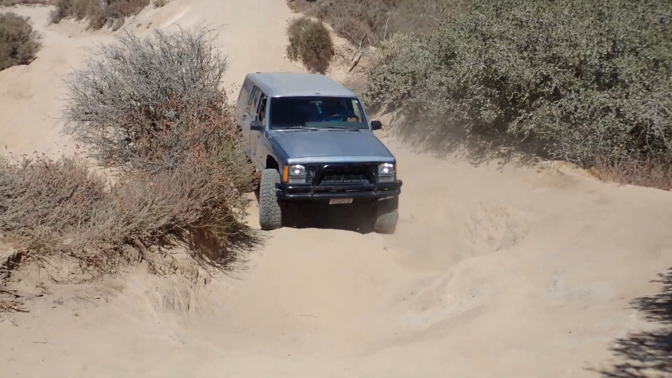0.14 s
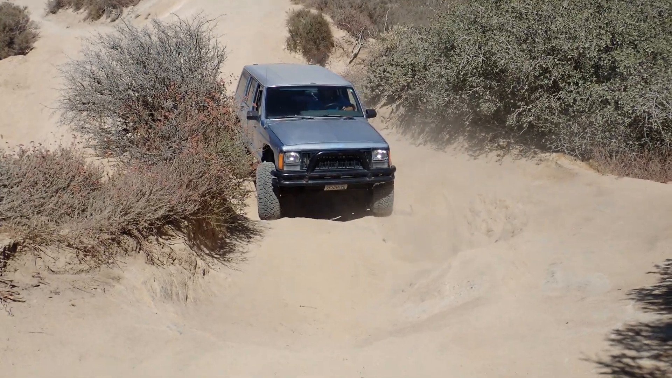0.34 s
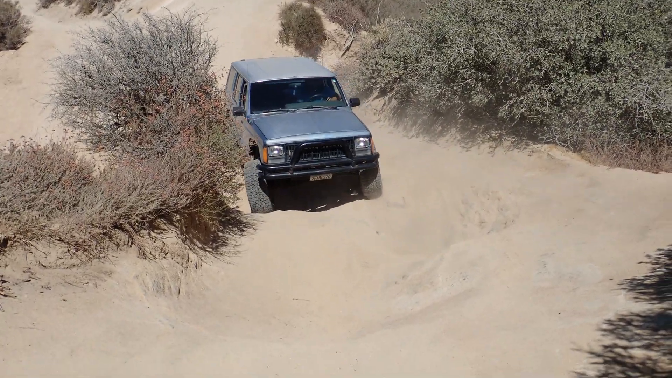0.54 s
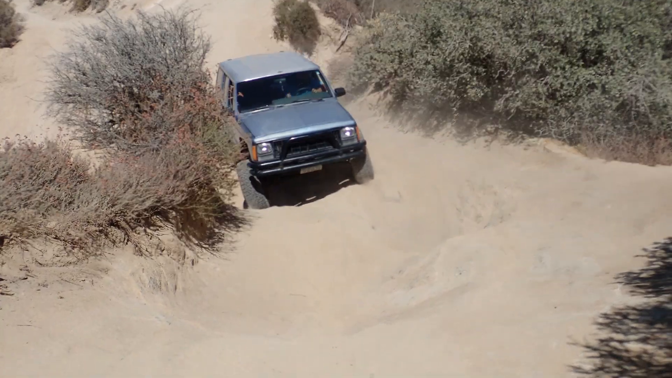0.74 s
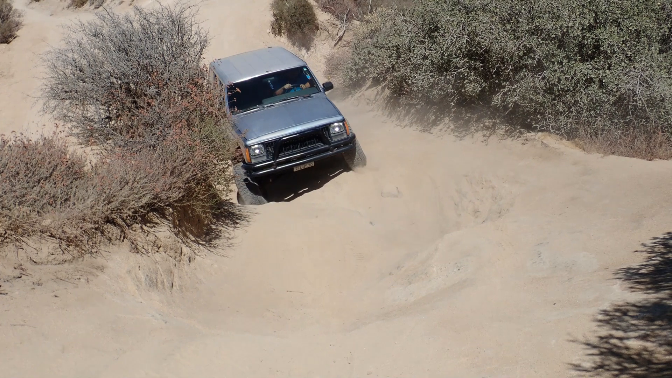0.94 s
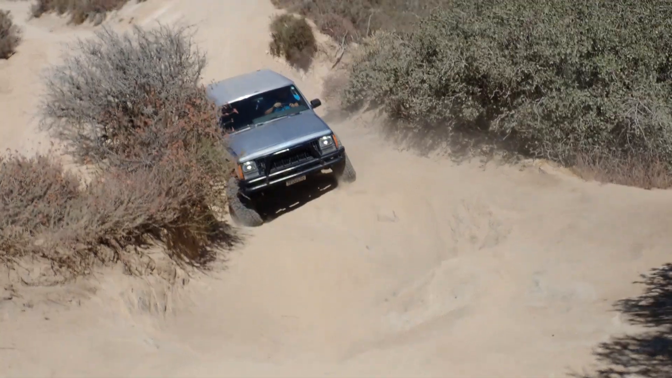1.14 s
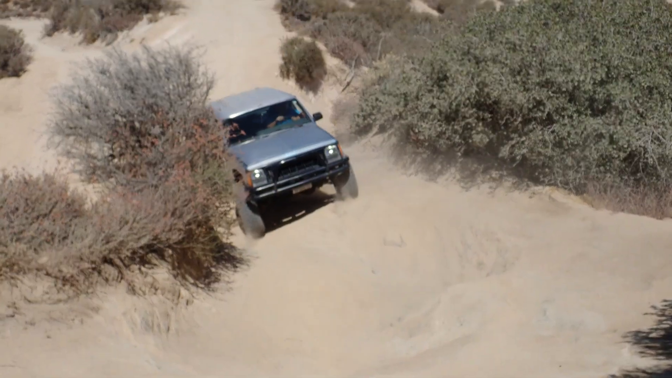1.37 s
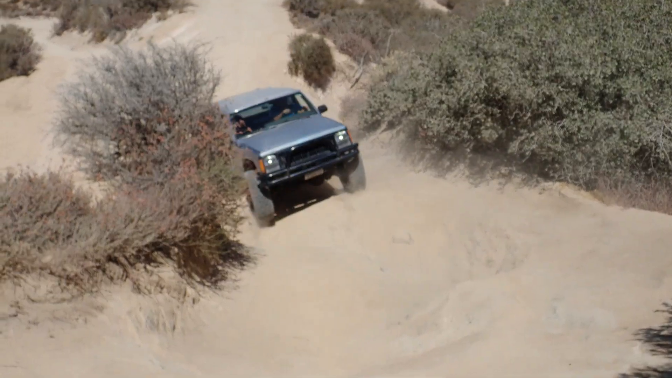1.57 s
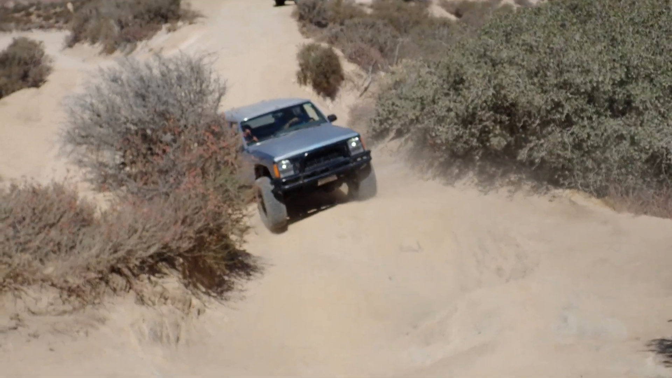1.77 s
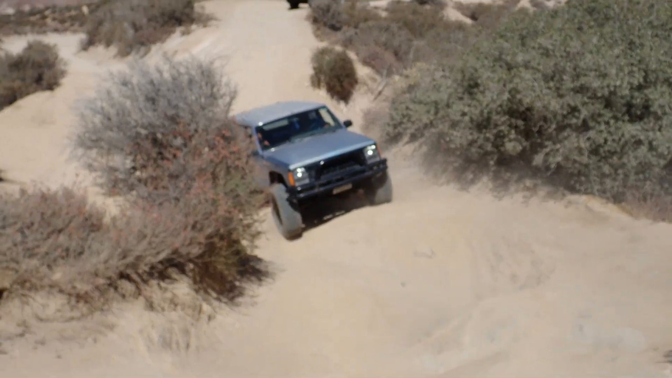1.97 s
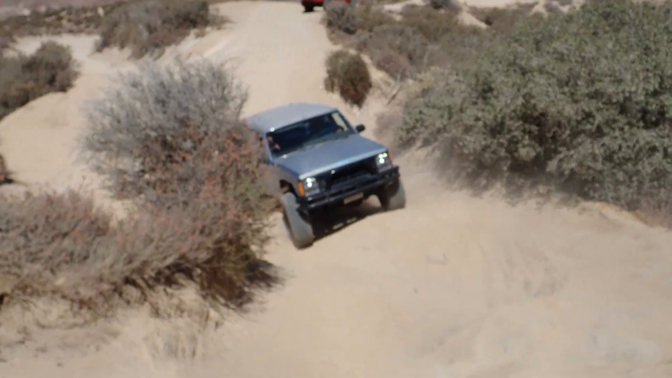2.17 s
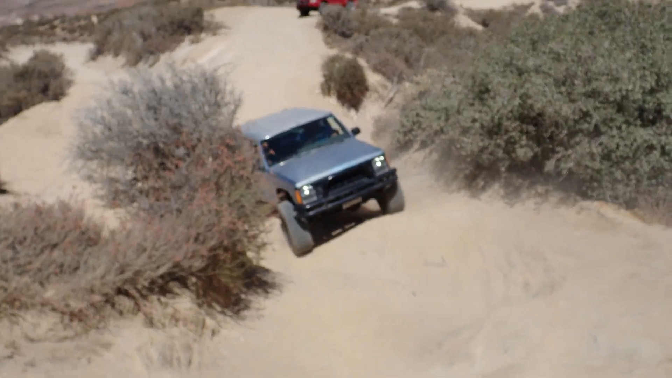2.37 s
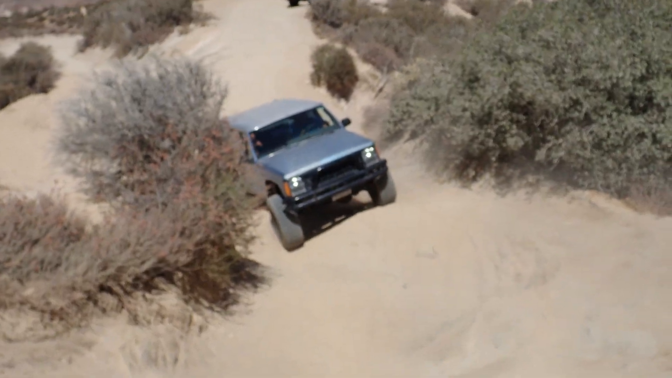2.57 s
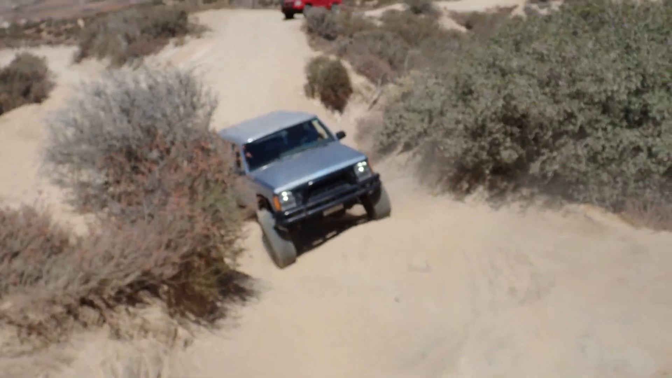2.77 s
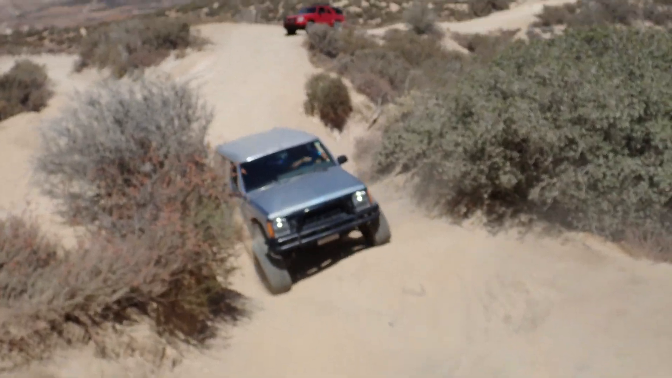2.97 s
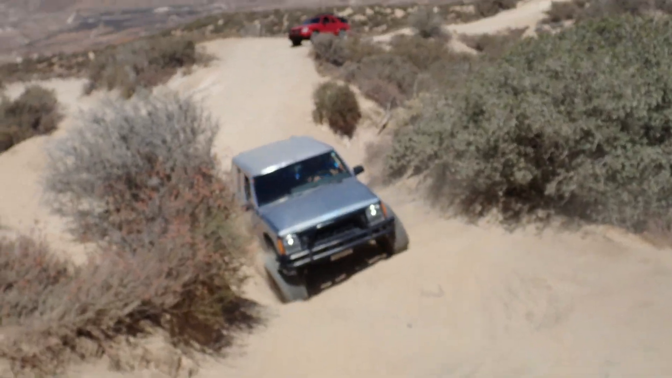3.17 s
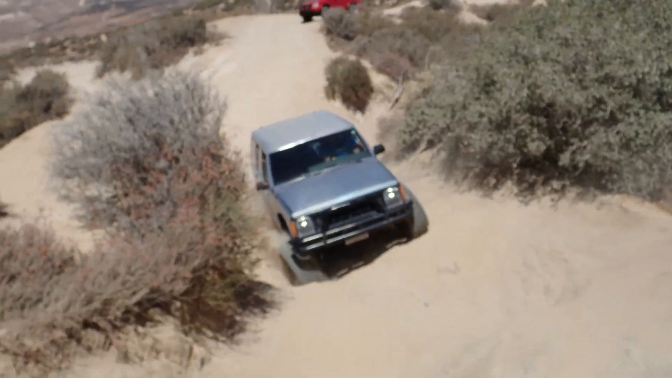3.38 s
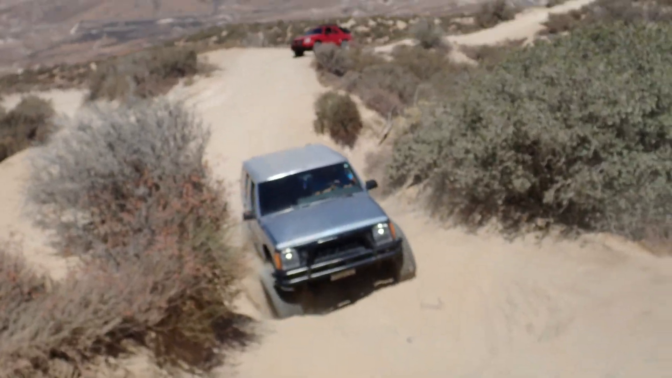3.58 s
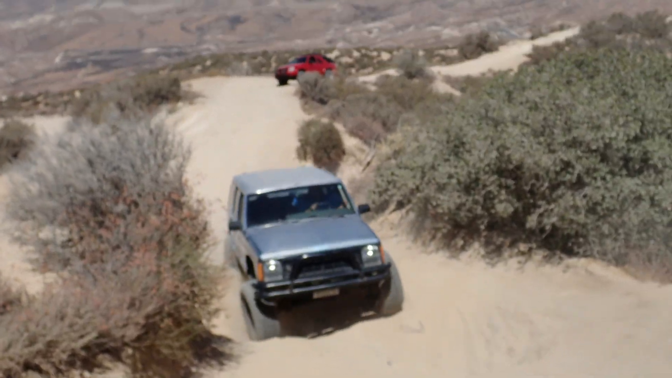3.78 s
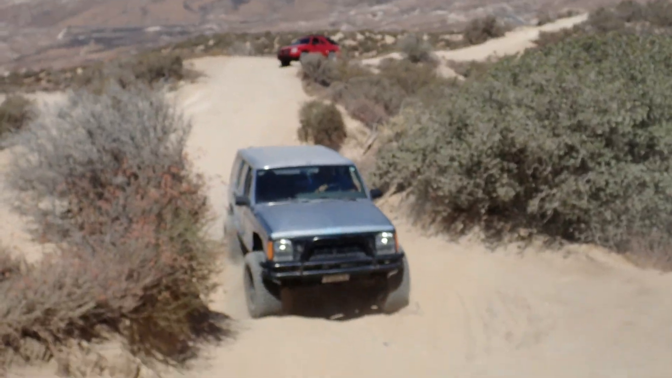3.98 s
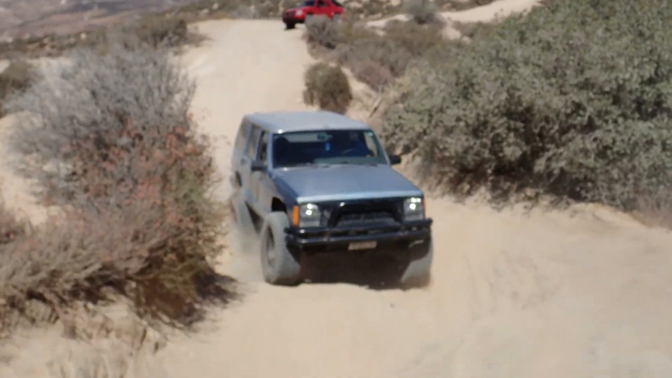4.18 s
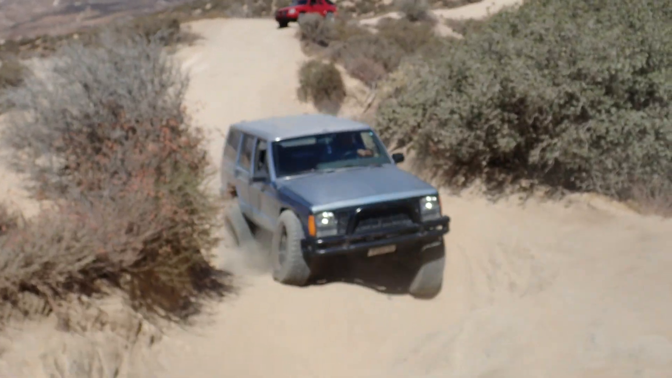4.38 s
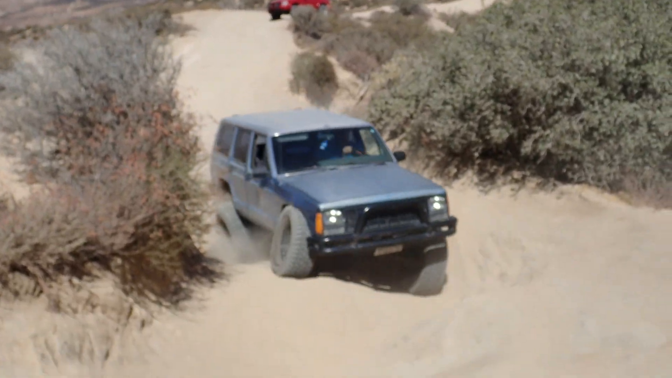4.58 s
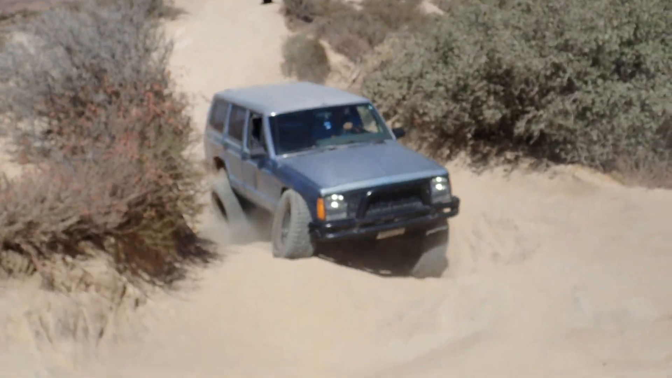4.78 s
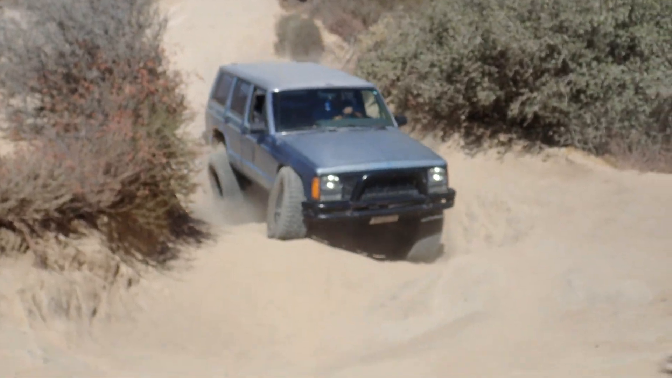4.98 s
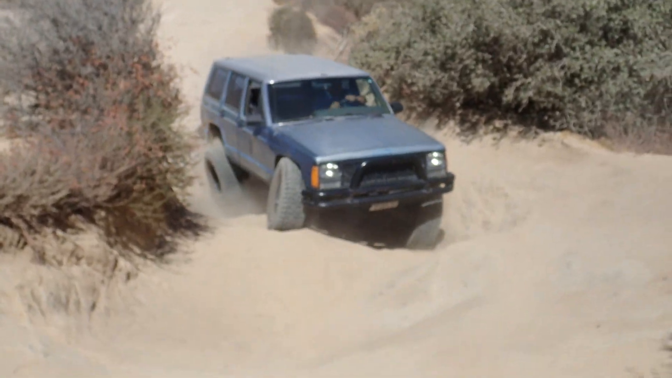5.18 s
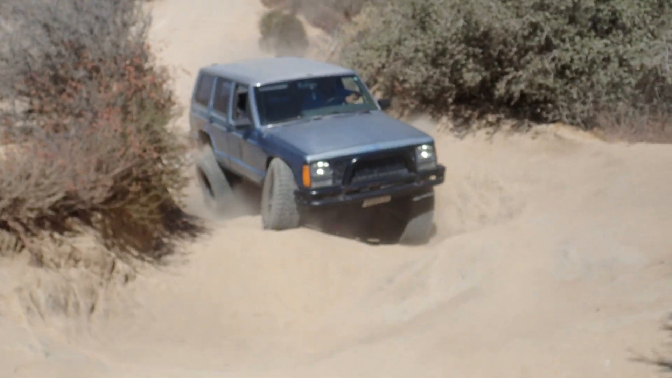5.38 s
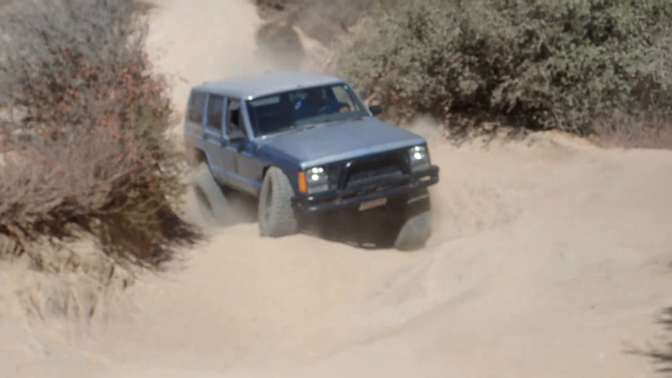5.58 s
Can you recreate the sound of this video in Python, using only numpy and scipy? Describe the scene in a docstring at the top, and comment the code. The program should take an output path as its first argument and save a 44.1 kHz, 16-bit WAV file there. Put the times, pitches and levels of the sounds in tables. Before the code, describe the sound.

A six-cylinder off-road vehicle works up a rutted dirt slope, heard outdoors from in front by a small stereo microphone. It begins with a low, uneven burble under airy hiss and trickling sand, with faint tyre scuffs. At about 0.9 s the throttle opens and a deep exhaust drone sweeps upward, peaking near 1.6 s and dropping by 2.1 s; a short rough tyre groan sounds around 1.8 s. A longer, stronger surge follows from 2.1 to 3.8 s, highest near 3.6 s, with gritty crunches from 3.1 s and rattly engine roar growing closer. The pitch falls, then a brief rev comes at 4.2 s. Sharp stone snaps strike around 4.4 s, another short rev follows at 4.5 s, and dense tyre crunches and thuds cluster from 4.6 to 5.0 s. The exhaust then softens and sinks to a low burble by 5.6 s, with smaller scrubs and a faint click.

```python
"""On a rutted dirt slope a six-cylinder SUV climbs in bursts of throttle towards two microphone ports.
Speed and throttle set the engine levels: the exhaust drones at its firing rate and octave, booms and rasps.
Intake and engine bay noise roars with rattles in it; fan air and trickling sand hiss above.
The tyres scrub and crunch as filtered noise bursts, one slip groans through narrow resonances, and stones
snap as short decaying tones. The unequal ports separate the treble in level and phase."""
import sys
import numpy as np
from scipy import signal
from scipy.fft import rfft, irfft
from scipy.io import wavfile
from scipy.ndimage import uniform_filter1d

SR = 44100
rng = np.random.default_rng(int(sys.argv[2]) if len(sys.argv) > 2 else 0)


def unload_audio(sound):
    """Save the sound as a 16-bit wav file, at the path given as the first command line argument."""
    columns = np.transpose(np.atleast_2d(sound))
    # keep every value between -1 and 1, then stretch to whole-number steps
    steps = np.round(np.clip(columns, -1, 1) * 32767)
    wavfile.write(sys.argv[1], SR, steps.astype(np.int16))


N = 248283
T = np.arange(N) / SR  # time of each sample [s]

# Engine speed: (time [s], firing rate [Hz])
SPEED = [(0, 49.57), (.6, 45.97), (.93, 49.34), (1.4, 101.3), (1.6, 110.8), (1.72, 102), (2.1, 46.76),
         (2.2, 49.93), (2.45, 94.4), (2.7, 120.8), (3, 111.8), (3.42, 125.4), (3.58, 139.2), (3.85, 124.6),
         (4.23, 78.73), (4.5, 102.9), (4.9, 62.95), (5.18, 61.44), (5.3, 46.92), (5.63, 36.35)]
# Presses of the pedal: (down [s], opening time [s], up [s], throttle [1 = a hard push])
SURGES = [(.89, 0.22, 1.9, 0.92), (2.09, 0.21, 3.8, 0.97), (3.58, .1, 3.8, 0.89), (4.2, .08, 4.37, 1.05),
          (4.47, 0.031, 5.6, .48)]
# The vehicle comes out past the bushes and nears: (time [s], gain [dB])
APPROACH = [(0, -6), (2.2, -6.5), (3.2, -1.5), (4.1, 0), (4.45, -2.5), (5.15, 0.5), (5.63, -1.5)]
# The vehicle turns and its body screens the tailpipe: (time [s], gain [dB])
TAILPIPE = [(4.6, 0), (5.45, -8)]

# Response of each engine part, before trims and pipe gain: (level off throttle at CRUISE_HZ [dB],
# rise at throttle 1 [dB], rise per doubling of speed [dB], share of the approach gain [1])
TONE_LAW = (-46, 26.5, 1, 0.45)
OCTAVE_LAW = (-40.5, 13, -1, 0.44)
BOOM_LAW = (-33.5, -0.5, 3, .5)
RASP_LAW = (-45.5, 11, 10, 0.4)
ROAR_LAW = (-31, 1, 3.5, 1.32)
HISS_LAW = (-33, 1, 6.5, .5)

# Gain of the exhaust pipe as the drone sweeps through it: (frequency [Hz], gain [dB])
PIPE_COLOUR = [(45, -4.5), (70, -3), (92, 1), (120, -2), (145, -1.5), (168, 3.5), (195, 4), (218, -7.5),
               (236, -18), (258, -2.5), (280, -1)]
# Third, fourth and fifth multiples of the firing rate: (relative level [dB] of each)
OVERTONE_LEVELS = (0.5, -3.5, -11)
# Unequal cylinders; multiples of three belong to the firing rate:
# (multiple of the crank speed [1], relative level [dB])
ORDERS = [(2, -4.5), (4, -5.5), (5, 1.5), (7, -3), (8, -31), (9, 8), (10, -2), (11, -1), (12, -6.5),
          (13, 1.5)]
# Spectra of the parts, relative levels: (frequency [Hz], level [dB])
BOOM_COLOUR = [(25, -26), (45, -20), (70, -5.5), (105, -7), (142, -5), (165, 3), (192, 1.5), (220, -4.5),
               (270, -13.5), (500, -42)]
RASP_COLOUR = [(80, 3.5), (140, -27), (190, 8), (250, -0.5), (300, -26.5), (345, -4), (410, -1.5),
               (460, 7.5), (510, -13), (650, -49)]
ROAR_COLOUR = [(120, 3.5), (250, -2.5), (340, 0), (390, -2), (460, 1.5), (550, -4), (680, -10), (850, -0.5),
               (1100, -5), (1500, -7.5), (2000, -15), (2600, -30), (3400, -33.5), (6000, -36)]
HISS_COLOUR = [(1650, -145), (2800, -41), (3600, -32.5), (4820, -17.5), (5650, -0.5), (6240, 4),
               (6710, -1.5), (7800, -15), (9060, -8.5), (9590, -15), (10700, -29), (14400, -31.5),
               (15500, -33)]
TREAD_COLOUR = [(50, 10.5), (550, 9), (680, 1), (820, 5), (1500, 3), (2100, -4), (3000, -16.5), (5000, -13)]

# Tyres scrubbing and crunching in the ruts:
# (time [s], rise [s], fade [s], body resonance [Hz], body level [dB], grit level [dB])
SCRUBS = [(.121, 0.0035, 0.0056, 1070, -35.5, -57), (.2, .07, 0.094, 423, -40, -38),
          (1.03, .05, 0.045, 1000, -44, -41.5), (1.76, 0.038, 0.019, 440, -46, -42),
          (2.1773, 0.001, 0.011, 1220, -32, -33), (3.065, 0.039, 0.021, 972, -31, -24),
          (3.385, 0.0095, 0.014, 895, -44, -26), (3.49, 0.023, 0.022, 834, -28, -29),
          (3.64, 0.049, 0.075, 420, -30, -51), (3.85, 0.15, 0.16, 799.3, -34.5, -40),
          (3.89, 0.036, 0.03, 105, -30, -39), (3.95, 0.018, 0.023, 187, -26.5, -50),
          (4.576, 0.0076, 0.025, 980, -27, -30), (4.58, 0.048, 0.085, 313, -25.5, -34.5),
          (4.648, 0.0053, 0.0079, 850, -24.5, -22), (4.679, 0.031, 0.011, 1350, -26.5, -23),
          (4.56, 0.11, 0.11, 100.1, -23.5, -49), (4.66, 0.044, 0.052, 563, -30, -46),
          (4.771, 0.0048, 0.014, 1000, -20.5, -19.5), (4.801, 0.0066, 0.012, 350, -24.5, -34),
          (4.87, .07, 0.056, 886, -37, -31.5), (4.973, 0.025, 0.031, 590, -19.5, -40),
          (4.96, 0.028, 0.034, 89, -38, -50), (5.028, 0.0081, 0.0076, 894, -43, -26.5),
          (5.2, .11, 0.068, 1230, -30.5, -53), (5.329, 0.0028, .006, 1178, -47, -33.5),
          (5.32, .035, 0.048, 498, -27, -59), (5.51, 0.047, 0.03, 909, -29.5, -55),
          (5.59, 0.006, 0.0099, 1230, -35.5, -34)]
# A slipping tyre groans: (time [s], level [dB])
GROAN = [(1.66, -54), (1.72, -33.5), (1.78, -27), (1.84, -31.5), (1.9, -42), (1.96, -77)]
# Its rough tones: (frequency [Hz], relative level [dB])
GROAN_TONES = [(458, -3.5), (890, 1), (1050, 1.5), (1230, -4)]
# Stones snapping: (time [s], ring frequency [Hz], ring level [dB])
STONES = [(4.4188, 8900, -15), (4.4198, 6495, -10), (4.4301, 8415, -10), (4.497, 9000, -33),
          (5.469, 9300, -37)]
# Inequality of the microphone ports: (frequency [Hz], left minus right [dB], left leads by [rad])
PORTS = [(4230, 4, 0), (4640, -16.5, -.4), (5040, 11, 2.4), (5500, 4, 0), (5850, 3.5, -0.53),
         (6360, -5.5, -0.33), (7950, -0.5, 0.81), (8570, 10, .6), (8960, -1.5, -0.43), (10400, 0.5, 0)]

CRUISE_HZ = 100  # firing rate at which the law levels hold
RELEASE_S, OCTAVE_RELEASE_S = 0.12, 0.18  # fall after the pedal lifts; the octave hangs on longer
EASE_PER_S = 0.14  # the foot eases off during a long press
RING_DB, GAS_DB = -3.5, -4.5  # overtones and gas noise within the boom
TOP_HZ = 15600  # upper band limit


def undb(db):
    """Amplitude ratio: the gain equal to a level in decibels."""
    return 10 ** (np.asarray(db) / 20)


def unit(x):
    """Normalisation: scale to rms 1."""
    return x / np.sqrt(np.mean(x ** 2))


def curves(table):
    """Linear interpolation: the columns of a table as one value per sample."""
    s, *columns = np.transpose(table)
    return [np.interp(T, s, c) for c in columns]


def colour(x, points):
    """Spectral shaping: levels joined over log frequency, falling steeply beyond the ends; rms 1."""
    hz, db = np.transpose(points)
    octave = np.log2(np.fft.rfftfreq(N, 1 / SR) + 1)
    knots = np.log2(hz)
    beyond = np.abs(octave - np.clip(octave, knots[0], knots[-1]))
    level = np.interp(octave, knots, db) - 54 * beyond  # dB per octave outside
    return unit(irfft(rfft(x) * undb(level), N))


def resonance(x, hz, q):
    """Simple resonance: a second-order band-pass selects one peak; rms 1."""
    return unit(signal.lfilter(*signal.iirpeak(hz, q, fs=SR), x))


def walk(rate):
    """Slow modulation: random steps, rate per second, smoothed twice; rms 1."""
    size = int(SR / rate)
    steps = np.repeat(rng.standard_normal(N // size + 1), size)
    smooth = uniform_filter1d(uniform_filter1d(steps, size), size)
    return unit(smooth[:N])


def grains(per_s, spread_db):
    """Impulsive noise: random tiny impacts with exponentially distributed levels in dB; rms 1."""
    hit = rng.random(N) < per_s / SR
    sign = rng.choice([-1, 1], N)
    size = undb(spread_db * np.minimum(rng.exponential(size=N), 5))
    return unit(hit * sign * size)


def ports(pair, apart):
    """Partial coherence: a shared signal plus an opposed one reaches the two ports."""
    mid, side = pair
    return mid + apart * side * np.array([[1], [-1]])


def pedal(release_s):
    """Throttle envelope: each press opens, eases off exponentially and closes linearly."""
    throttle = np.zeros(N)
    for down, opening, up, depth in SURGES:
        held = np.maximum(T - down, 0)
        opened = np.minimum(held / opening, 1)
        closing = np.clip(1 - (T - up) / release_s, 0, 1)
        press = opened * np.exp(-EASE_PER_S * held) * closing
        throttle = np.maximum(throttle, depth * press)
    return throttle


def level_db(law, release_s=RELEASE_S):
    """Source level law: throttle, octaves of speed and nearness add in decibels."""
    rest_db, throttle_db, doubling_db, near_share = law
    firing_hz, = curves(SPEED)
    near_db, = curves(APPROACH)
    speed_db = doubling_db * np.log2(firing_hz / CRUISE_HZ)
    return rest_db + throttle_db * pedal(release_s) + speed_db + near_share * near_db


def pipe(hz):
    """Duct resonance: the exhaust pipe's gain in dB depends on pitch."""
    return np.interp(hz, *np.transpose(PIPE_COLOUR))


def drone(crank, tone_db, octave_db):
    """Periodic excitation: three firings a turn give a deep, clean tone and its octave."""
    firing = 3 * crank
    tone = undb(tone_db - 2.3 + 1.0 * walk(30.37)) * np.cos(firing)
    octave = undb(octave_db - 2.1 + 0.65 * walk(30)) * np.cos(2 * firing - np.pi / 4)
    return np.sqrt(2) * (tone + octave)


def order_line(crank, multiple, flutter_db, wobble):
    """Engine order: a multiple of the crank speed, starting at a random phase and a little unsteady."""
    start_phase = rng.uniform(0, 2 * np.pi)
    phase = multiple * crank + start_phase + wobble * walk(20)
    return undb(flutter_db * walk(12)) * np.cos(phase)


def puffs(crank, depth):
    """Pulsating flow: gas noise swells at every firing."""
    firing = 3 * crank
    return rng.standard_normal(N) * np.exp(depth * np.cos(firing))


def exhaust(crank, boom_db, rasp_db):
    """Forced resonance: firings and gas ring the silencer, unequal cylinders rasp in the pipe."""
    overtones = sum(undb(db) * order_line(crank, m, flutter_db=1.5, wobble=.35)
                    for m, db in zip((9, 12, 15), OVERTONE_LEVELS))
    ring = undb(RING_DB) * colour(overtones, BOOM_COLOUR)
    gas = undb(GAS_DB) * colour(puffs(crank, depth=0.78), BOOM_COLOUR)
    uneven = sum(undb(db) * order_line(crank, m, flutter_db=2, wobble=.3) for m, db in ORDERS)
    strokes = uneven * (1 + .5 * np.cos(3 * crank))
    return undb(boom_db) * (ring + gas) + undb(rasp_db) * colour(strokes, RASP_COLOUR)


def roar(crank, roar_db):
    """Broadband radiation: intake and engine bay noise, with valve gear and chassis rattling in it."""
    drive = unit(puffs(crank, depth=0.087)) + undb(-4.5) * grains(per_s=400, spread_db=0.5)
    # a half-strength copy of the clatter comes round again after two turns of the crank
    drive = drive + 0.5 * np.interp(crank - 4 * np.pi, crank, drive)
    return undb(roar_db + 0.43 + 1.0 * walk(24.88)) * colour(drive, ROAR_COLOUR)


def scatter(engine):
    """Diffuse scattering: banks and bushes return noise-smeared copies over a few milliseconds."""
    t = T[:SR // 8]
    tail = rng.standard_normal(len(t)) * np.exp(-t / 0.0066)
    return signal.fftconvolve(engine, tail / np.linalg.norm(tail))[:N]


def hiss(hiss_db):
    """Turbulence and impacts: fan air and trickling sand, coloured by the ringing ports."""
    pair = []
    for _ in range(2):
        air = rng.standard_normal(N)
        sand = undb(-10.5) * grains(per_s=300, spread_db=4.0)
        pair.append(colour(air + sand, HISS_COLOUR))
    return undb(hiss_db - 0.03 + .5 * walk(45)) * ports(pair, apart=.29)


def tyres():
    """Frictional excitation: each scrub is a resonant burst from the tread and a spray of grit."""
    tread = colour(rng.standard_normal(N) + .5 * grains(per_s=1500, spread_db=0.5), TREAD_COLOUR)
    sprays = [colour(rng.standard_normal(N) + .5 * grains(per_s=2900, spread_db=10.0), HISS_COLOUR)
              for _ in range(2)]
    grit = ports(sprays, apart=0.1)
    out = np.zeros((2, N))
    for s, rise, fade, hz, body_db, grit_db in SCRUBS:
        shape = np.clip((T - s) / rise, 0, 1) * np.exp(-np.maximum(T - s - rise, 0) / fade)
        body = undb(body_db) * resonance(tread, hz, q=1.66)
        out += shape * (body + undb(grit_db) * grit)
    return out


def groan():
    """Stick-slip: rubber on hard dirt, as noise, rings a few narrow resonances."""
    groan_db, = curves(GROAN)
    slips = rng.standard_normal(N)
    tones = sum(undb(db) * resonance(resonance(slips, hz, q=8.2), hz, q=5.6)
                for hz, db in GROAN_TONES)
    return undb(groan_db) * unit(tones)


def stones(ring_s, crack):
    """Impact: a snapping stone gives a bright crack and a ring of about a millisecond."""
    out, t = np.zeros((2, N)), T[:512]
    envelope = (t / ring_s * np.exp(1 - t / ring_s)) ** 2  # peaks at 1 when t = ring_s
    for s, hz, db in STONES:
        bright = np.diff(rng.standard_normal(len(t) + 1))  # differencing favours the treble
        snap = np.sin(2 * np.pi * hz * t) + crack * resonance(bright, hz, q=2.07)
        start = int(s * SR)
        out[:, start:start + len(t)] += undb(db) * snap * envelope
    return out


def scene():
    """Superposition: engine speed turns the crank and all sources add, the engine straight ahead."""
    firing_hz, = curves(SPEED)
    tailpipe_db, = curves(TAILPIPE)
    unsteady_hz = firing_hz * (1 + .004 * walk(25))
    crank = 2 * np.pi * np.cumsum(unsteady_hz) / SR / 3  # crank angle [rad]
    tone_db = level_db(TONE_LAW) + pipe(firing_hz)
    octave_db = level_db(OCTAVE_LAW, OCTAVE_RELEASE_S) + pipe(2 * firing_hz)
    rear = drone(crank, tone_db, octave_db) + exhaust(crank, level_db(BOOM_LAW), level_db(RASP_LAW))
    engine = undb(tailpipe_db) * rear + roar(crank, level_db(ROAR_LAW))
    vehicle = ports([engine, scatter(engine)], apart=0.011) + hiss(level_db(HISS_LAW))
    return vehicle + tyres() + groan() + stones(ring_s=0.00038, crack=0.21)


def record(dry):
    """Transfer functions: unequal ports split treble level and phase; a steep low-pass cuts the top."""
    hz, db, lead = np.transpose(PORTS)
    bins = np.fft.rfftfreq(N, 1 / SR)
    half = np.array([[.5], [-.5]])  # each port takes half the inequality
    gain = undb(half * np.interp(bins, hz, db, left=0))
    turn = np.exp(1j * half * np.interp(bins, hz, lead, left=0))
    heard = irfft(rfft(dry) * gain * turn, N)
    return signal.sosfilt(signal.ellip(10, .2, 80, TOP_HZ, fs=SR, output="sos"), heard)


dry = scene()
out = record(dry)
unload_audio(out)
```